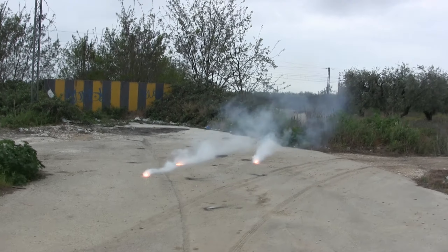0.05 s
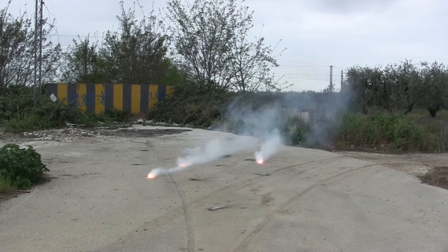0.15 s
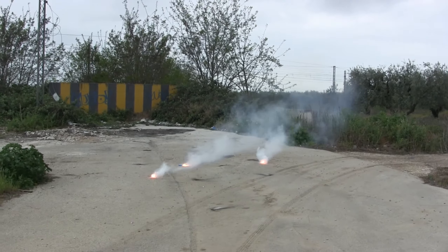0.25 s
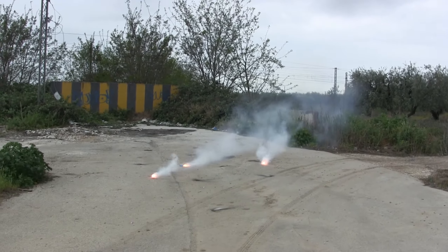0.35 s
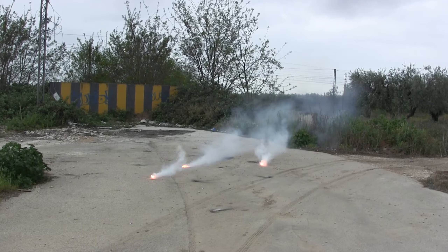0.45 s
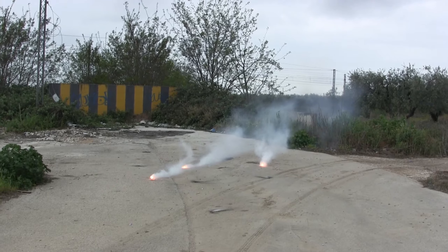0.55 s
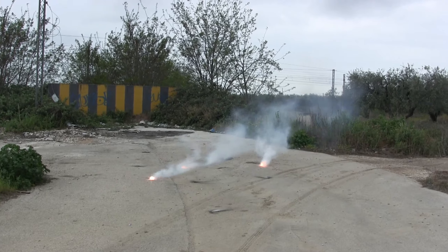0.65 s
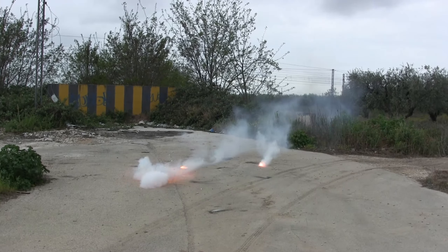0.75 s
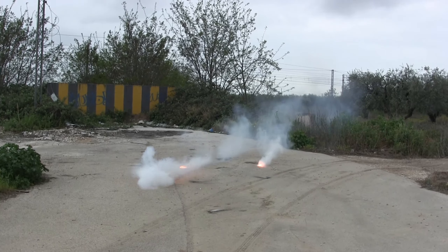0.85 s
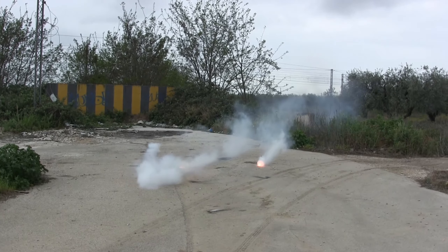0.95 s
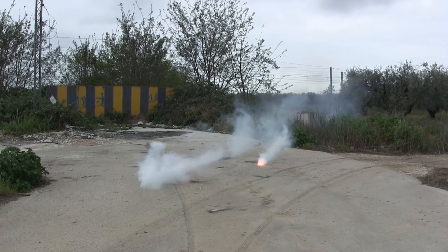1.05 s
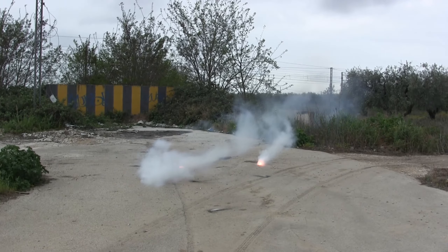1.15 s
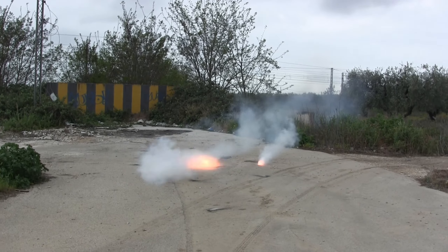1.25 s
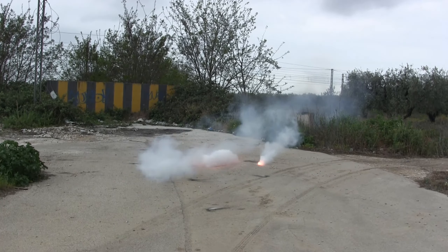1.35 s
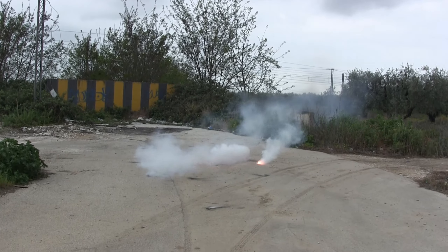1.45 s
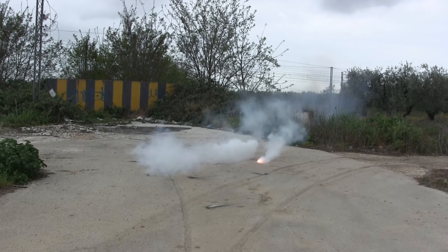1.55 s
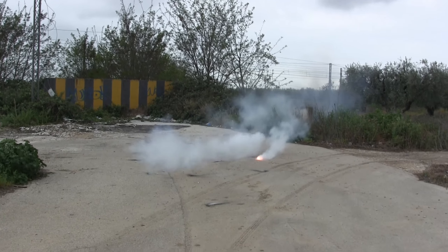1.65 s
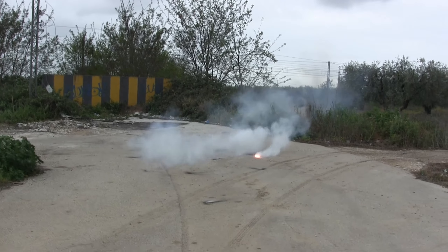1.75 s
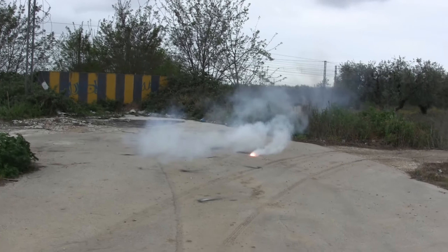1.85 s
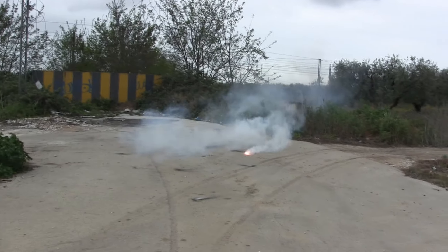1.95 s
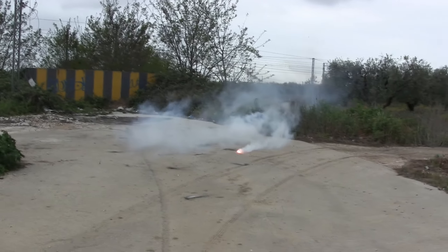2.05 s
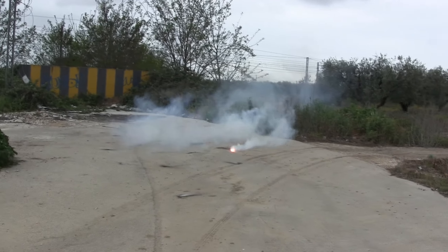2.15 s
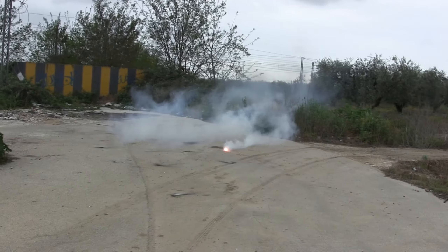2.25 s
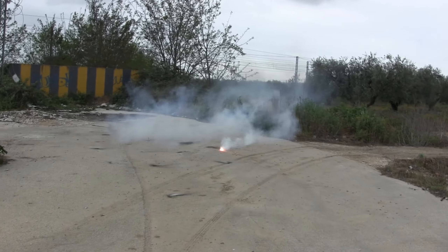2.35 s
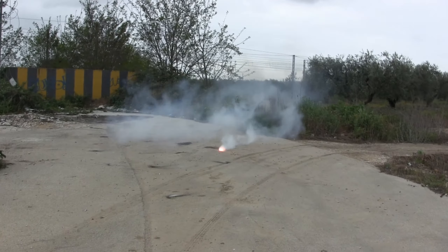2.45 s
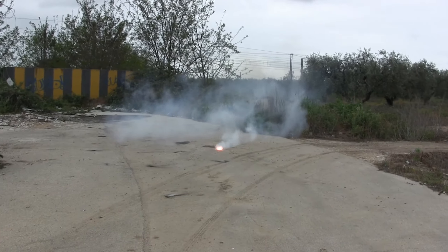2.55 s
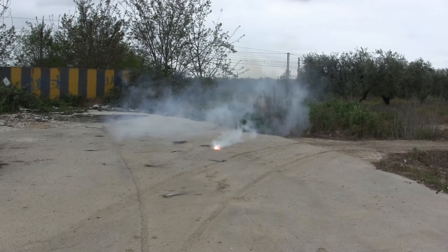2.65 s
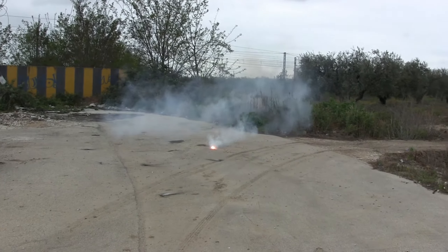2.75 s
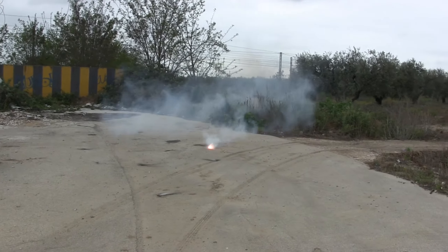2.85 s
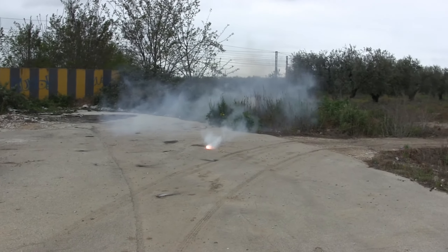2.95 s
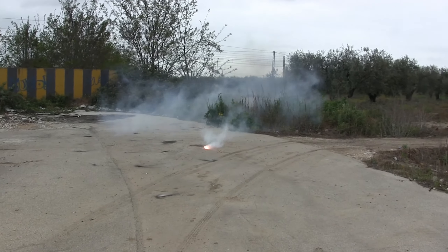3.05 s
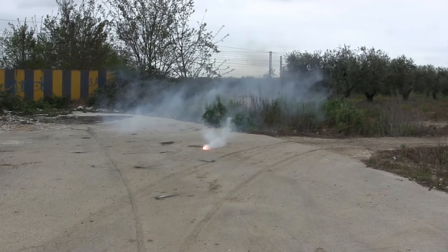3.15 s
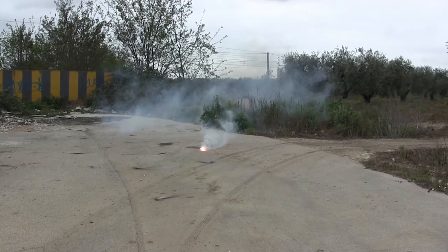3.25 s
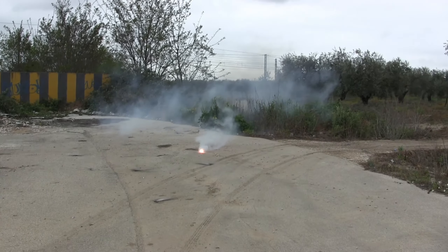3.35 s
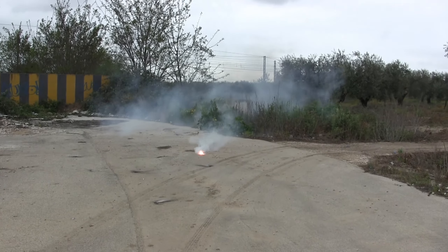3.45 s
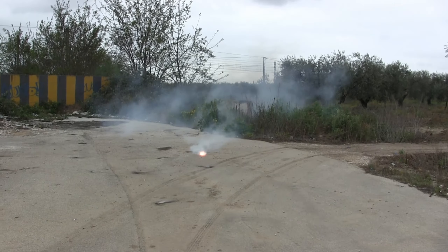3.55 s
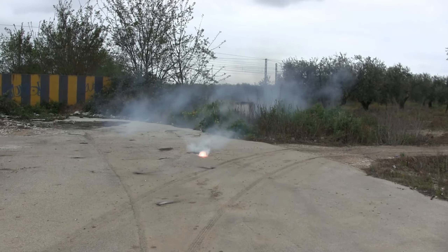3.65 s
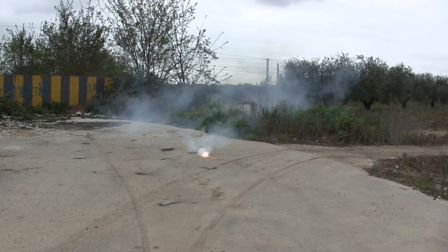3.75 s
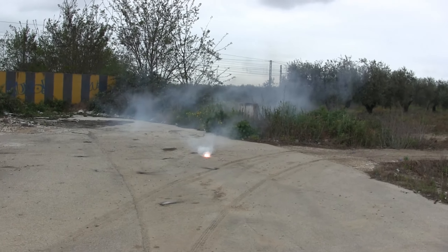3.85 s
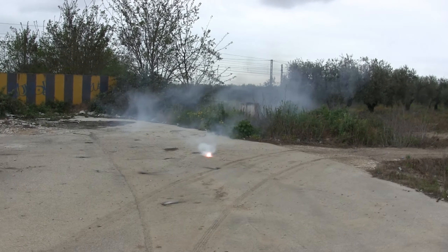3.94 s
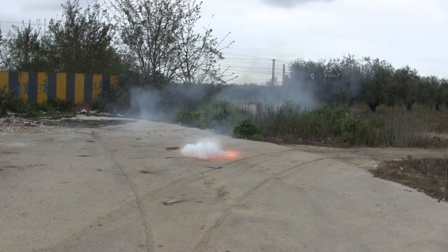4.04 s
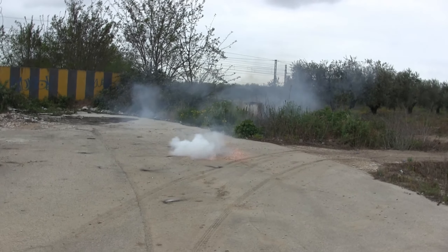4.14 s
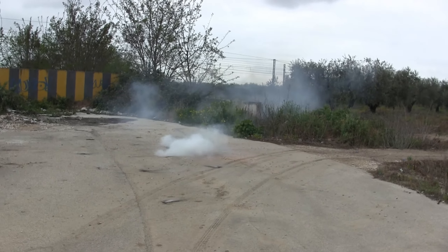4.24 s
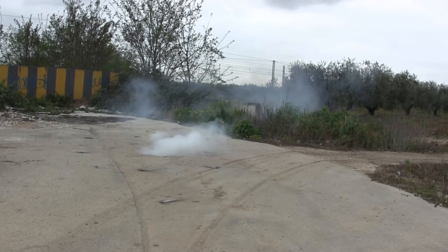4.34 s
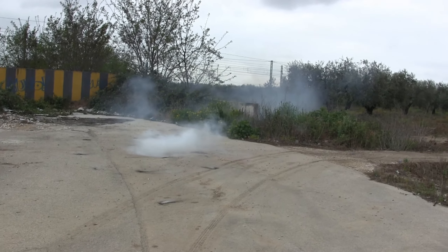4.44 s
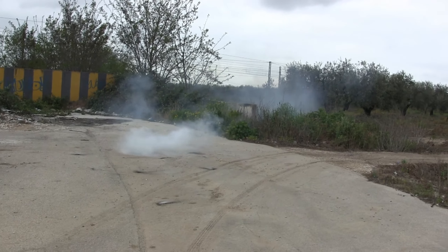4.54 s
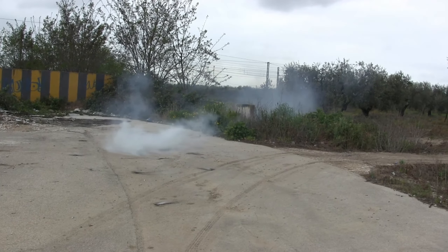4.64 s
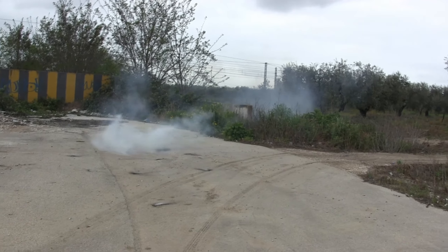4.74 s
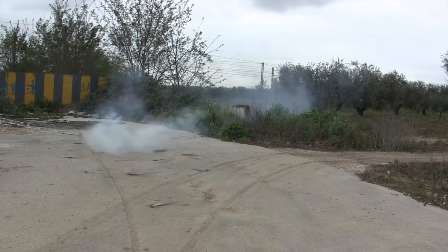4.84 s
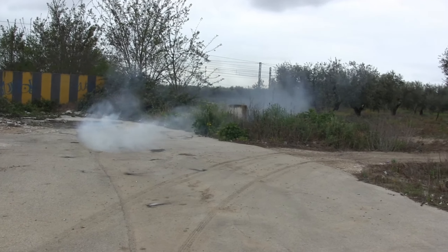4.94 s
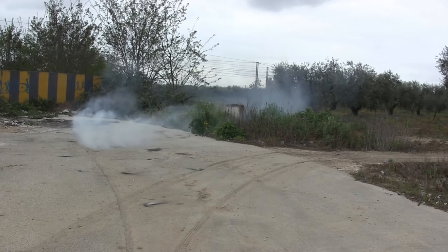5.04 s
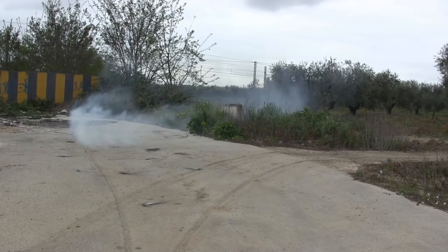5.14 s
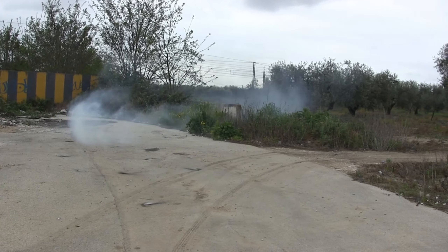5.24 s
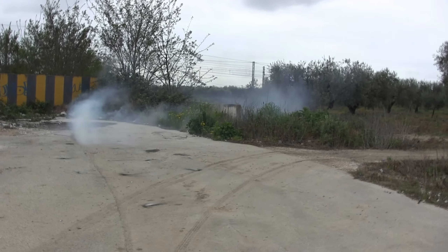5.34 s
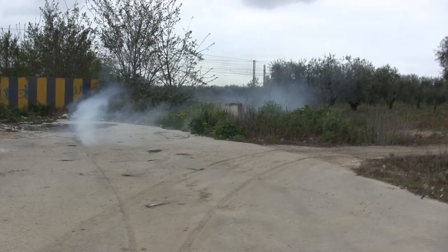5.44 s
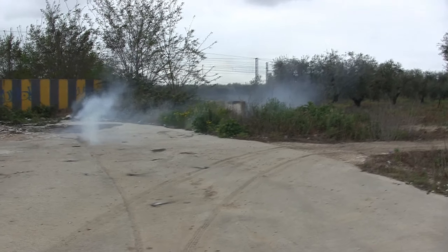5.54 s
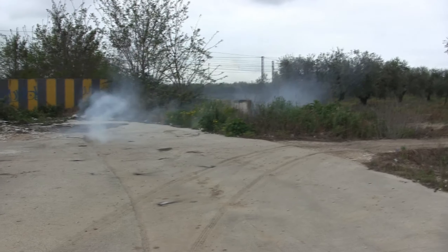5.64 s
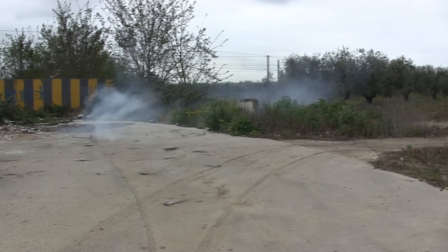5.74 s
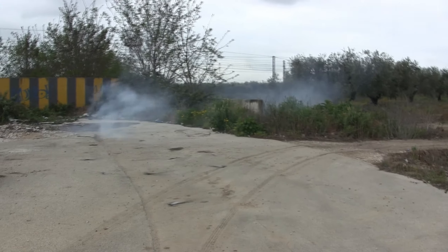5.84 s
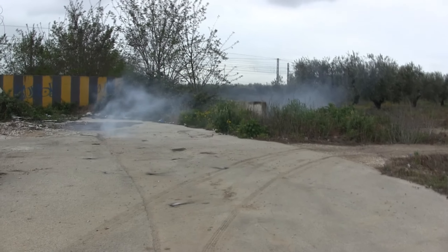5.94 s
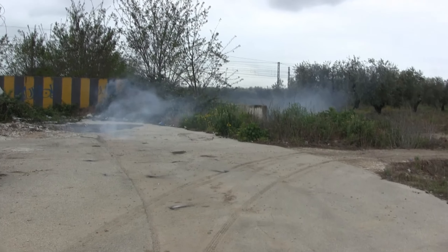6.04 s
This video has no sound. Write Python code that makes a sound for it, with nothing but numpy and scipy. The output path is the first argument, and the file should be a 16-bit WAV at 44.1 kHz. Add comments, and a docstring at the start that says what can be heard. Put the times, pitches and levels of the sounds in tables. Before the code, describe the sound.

An open concrete yard outdoors, a camcorder microphone some metres from three firecrackers. From 0 to 0.8 s, strong wind thumps and flutters in the bass with a little rasp, over a faint, bright fuse hiss. At 0.86 s the first cracker explodes: an instant, clipped, dry crack that makes the recording level duck. A double knock from walls follows about 0.1 s later, then a dense, grainy roll from trees. At 1.43 s a second bang cuts in with similar knocks; hollow double claps return from a building off to the left near 1.4 and 2.0 s. From 2.2 to 3.8 s, softer wind thumps and thin hiss remain, with a small flare near 3.3 s. The last fuse sputters at 3.85 s; the third bang hits at 4.17 s, with wall knocks, rolling echoes and a hollow clap at 4.73 s. The tail fades into quiet rustle and low gusts until about 6 s.

```python
"""An open concrete yard, the microphone some metres from three firecrackers that burn down and explode.
Fuses hiss as coloured noise; each blast is a shock wave that overloads the microphone.
Walls, far buildings and trees return it as filtered shocks and noise; short bright ticks are noise bursts.
Wind buffets the microphone as bass noise, and the camcorder's gain control ducks everything after each bang."""
import sys
import numpy as np
from scipy import signal
from scipy.fft import rfft, irfft, next_fast_len
from scipy.io import wavfile
from scipy.ndimage import uniform_filter1d, minimum_filter1d, map_coordinates

SR = 44100
rng = np.random.default_rng(int(sys.argv[2]) if len(sys.argv) > 2 else 0)


def wav_record(signal):
    """Record a signal, one row per channel, as 16-bit PCM in the file named by sys.argv[1]."""
    frames = np.transpose(np.atleast_2d(signal))
    bounded = np.clip(frames, -1, 1)
    # unit amplitude maps onto the largest positive 16-bit level
    quanta = np.round(bounded * 32767).astype(np.int16)
    wavfile.write(sys.argv[1], SR, quanta)


N = 268569
SHORT = SR // 8  # samples in a short burst

# In the tables, colour_db is relative spectrum level and sigma_s the standard deviation of a bell-shaped swell.
# t60_s is the time to decay by 60 dB; likeness is left-right correlation, held within -1 to 1.


def amp(db):
    """Decibels to gain."""
    return 10 ** (np.asarray(db) / 20)


def unit(x):
    """Scale to rms 1."""
    return x / np.sqrt(np.mean(x ** 2) + 1e-20)


def along(points, hz):
    """Read (Hz, value) points on a logarithmic frequency axis."""
    point_hz, value = np.transpose(points)
    return np.interp(np.log(hz + 1), np.log(point_hz + 1), value)


def curve(rows):
    """Read (s, value) rows as one value per sample."""
    return np.interp(np.arange(N) / SR, *np.transpose(rows))


def wobble(rate, size=N):
    """A smooth random curve with rate knots a second."""
    knots = rng.standard_normal(int(size * rate / SR) + 4)
    return map_coordinates(knots, [np.arange(size) * rate / SR])


def edge(x, hz, kind, order=2):
    """Causal low-pass or high-pass."""
    sos = signal.butter(order, min(hz, .45 * SR), kind, fs=SR, output="sos")
    return signal.sosfilt(sos, x)


def add(track, s, sound):
    """Mix a sound into a track at time s."""
    start = max(round(s * SR), 0)
    part = track[:, start:][:, :sound.shape[-1]]
    part += sound[..., :part.shape[1]]


def noise(spectrum, alike, size=N, grain_db=0, per_s=SR):
    """Coloured stereo noise of rms 1; grain makes it crackle, a low rate leaves single clicks."""
    m = next_fast_len(size)
    hz = np.fft.rfftfreq(m, 1 / SR)
    # the likeness sets the balance of mid and side
    turn = np.arccos(np.clip(along(alike, hz), -1, 1)) / 2
    shape = amp(along(spectrum, hz)) * np.array([np.cos(turn), np.sin(turn)])
    grain = amp(grain_db * np.minimum(rng.standard_normal(m), np.pi))
    white = rng.standard_normal((2, m)) * grain
    white = white * (rng.random((2, m)) < per_s / SR)
    mid, side = irfft(rfft(white) * shape, m)[:, :size]
    return unit(np.array([mid + side, mid - side]))


def widen(x, db):
    """Raise or lower the part that differs between the channels."""
    mid = x.mean(axis=0)
    return mid + amp(db) * (x - mid)


def fade(t60):
    """An exponential decay."""
    return np.exp(-np.log(1000) * np.arange(SHORT) / SR / t60)


def swell(t60):
    """A decay with a rounded start."""
    return fade(t60) * (1 - fade(t60 / 3))


def surge(s, sigma_s):
    """A bell-shaped rise and fall around time s."""
    return np.exp(-.5 * ((np.arange(N) / SR - s) / sigma_s) ** 2)


def shock(push_ms):
    """A push and a longer suction, longer on the left; the microphone's bass cut makes it swing back."""
    channel_push_ms = push_ms * np.array([[1.13], [.88]])
    u = np.arange(SHORT) / SR * 1000 / channel_push_ms
    return edge((1 - u) * np.exp(-u), hz=142, kind="high")


def slap(centre_hz, t60, alike):
    """A rough surface smears a shock into a short coloured burst."""
    colour = [(centre_hz / 5, -18), (centre_hz / 1.4, 0), (centre_hz * 1.4, -1),
              (centre_hz * 2.2, -8), (centre_hz * 8, -24)]
    burst = noise(colour, [(1000, alike)], SHORT) * swell(t60)
    return amp(2.5) * edge(burst, 3 * centre_hz, "low")


# steady wind on the microphone, before its trim: time_s, level_db
WIND_STRENGTH = [(0.0, -16.5), (0.754, -18.5), (0.8, -19), (1.75, -28), (1.88, -25.5), (2.14, -26),
                 (3.1, -27), (3.67, -25), (4.04, -29.5), (4.15, -31), (4.3, -18.5), (4.584, -36.5),
                 (4.842, -40), (5.116, -53), (5.282, -24.5), (5.6, -20.5), (5.744, -20), (6.09, -33)]
# gusts that thump on the microphone, before their trim: centre_s, level_db, sigma_s
WIND_GUSTS = [(0.041, -1, 0.023), (0.12, -1.5, 0.011), (0.176, -1.5, 0.042), (0.28, 0.5, 0.01),
              (0.486, -3.5, 0.021), (0.703, -3, 0.02), (0.812, -7.5, 0.053), (1.173, -17, 0.039),
              (1.71, -4, 0.068), (1.949, -7.5, 0.032), (2.114, -6.5, 0.024), (2.309, -6, 0.036),
              (2.391, -22, 0.0085), (2.573, -4.5, 0.017), (2.668, -17, 0.026), (2.757, -13, 0.0093),
              (2.868, -16, 0.02), (3.504, -10.5, 0.02), (3.796, -13, 0.018), (4.133, -17, 0.017),
              (4.708, -17, 0.03), (5.113, -13.5, 0.024), (5.196, -12, 0.023), (5.448, -10.5, 0.023),
              (6.046, -9.5, 0.048)]
# colour of the buffeting, before its bass filters: freq_hz, colour_db
BUFFET_COLOUR = [(13, -40), (22, -8.5), (54, 0), (90, 1.5), (128, -0.5), (267, -11.5), (656, -31),
                 (977, -38), (1350, -45), (2600, -56), (3380, -78), (5720, -120)]
# stereo likeness of buffeting and rasp: freq_hz, likeness
BUFFET_LIKENESS = [(60, 0.13), (180, 0.34), (550, 0.28), (1650, -0.021), (4970, 0.79), (15000, 0.64)]
# colour of the rasp, where the hardest eddies tear: freq_hz, colour_db
RASP_COLOUR = [(300, -21), (600, -4), (1100, -1), (1700, -9), (3500, -25)]
# the sharpest gusts tear at the microphone: centre_s, level_db, sigma_s, centre_hz
TEARING_GUSTS = [(0.047, -28, 0.014, 1030), (0.186, -27.5, 0.0045, 990), (0.243, -32.5, 0.0055, 950),
                 (0.285, -35, .006, 950), (0.49, -39, 0.0081, 950), (0.683, -37.5, 0.016, 970),
                 (2.077, -30, 0.026, 296), (2.275, -31, 0.011, 380), (2.566, -36, 0.013, 600),
                 (2.646, -41, 0.031, 630), (2.842, -40.5, 0.02, 600), (3.104, -41.5, 0.048, 634),
                 (3.114, -31, 0.053, 308)]
# colour of a tearing gust: multiple_of_centre_hz, colour_db
TEAR_COLOUR = [(.2, -15), (.5, -3.5), (1, 5.5), (1.6, -12), (3.5, -24), (8, -43), (30, -83)]
# rustle of open country: freq_hz, colour_db
COUNTRY_COLOUR = [(25, -12), (55, -14), (110, -20), (290, -21), (500, -7), (604, -3), (893, -9.5),
                  (1090, -8), (1190, -8), (1530, -11), (5470, -26.5), (9630, -32.5), (16000, -37.5)]
# stereo likeness of the rustle and the fuse's spitting: freq_hz, likeness
COUNTRY_LIKENESS = [(300, -1.2), (700, -0.57), (1300, -0.55), (2500, -0.25), (5000, 0.45), (12000, 0.51)]
WIND_TRIM_DB, GUST_TRIM_DB = 4, -8
STEADY_BASS_HZ = 43.4  # small eddies carry little below this
GUST_BOOM_DB, GUST_BOOM_HZ = 2.5, 91.6  # gusts are big eddies and boom deeper
RASP_DB, RASP_FLUTTER_DB = -25, 2  # level at full-scale wind; scale of its short bursts
RASP_GROWS = 2.4  # dB of rasp per dB of wind


def wind():
    """Eddies and deeper gusts thump on the microphone ports, strong wind rasps; open country rustles."""
    steady = amp(curve(WIND_STRENGTH) + WIND_TRIM_DB)
    gusts = sum(amp(db + GUST_TRIM_DB) * surge(s, sigma_s) for s, db, sigma_s in WIND_GUSTS)
    shared_db = .7 * wobble(14) + 1.7 * wobble(55)
    channel_db = 1.3 * np.array([wobble(60), wobble(60)])
    eddies = unit(amp(shared_db + channel_db))
    steady_noise = edge(noise(BUFFET_COLOUR, BUFFET_LIKENESS), STEADY_BASS_HZ, "high", order=1)
    buffet = np.hypot(steady, gusts) * eddies * steady_noise
    deep_noise = edge(noise(BUFFET_COLOUR, BUFFET_LIKENESS), GUST_BOOM_HZ, "low")
    boom = amp(GUST_BOOM_DB) * gusts * deep_noise
    rasp_level = amp(RASP_DB + RASP_FLUTTER_DB * wobble(30)) * (steady * eddies) ** RASP_GROWS
    rasp = rasp_level * noise(RASP_COLOUR, BUFFET_LIKENESS)
    for s, db, sigma_s, hz in TEARING_GUSTS:
        colour = [(k * hz, level_db) for k, level_db in TEAR_COLOUR]
        rasp += amp(db) * surge(s, sigma_s) * noise(colour, BUFFET_LIKENESS)
    stir_db = .5 * wobble(3)
    rustle = amp(-41.0 + stir_db) * noise(COUNTRY_COLOUR, COUNTRY_LIKENESS)
    return buffet + boom + rasp + rustle


# soft, broad returns from far groves: centre_s, level_db, centre_hz, sigma_s
GROVE_RETURNS = [(1.137, -22, 560, 0.033), (1.207, -23.5, 615, 0.02), (1.702, -19, 620, 0.031),
                 (1.767, -17.5, 1190, 0.012), (4.42, -20, 880, 0.028), (4.518, -24.5, 800, 0.0098),
                 (2.112, -35, 1220, 0.034), (2.216, -30.5, 1150, 0.012), (4.667, -25.5, 1200, 0.0069),
                 (4.723, -28.5, 1290, 0.004), (4.964, -34.5, 1330, 0.029)]


def groves():
    """Far clumps of trees send each blast back as a soft swell of noise in the tail."""
    out = np.zeros((2, N))
    likeness = [(400, 0.45), (900, -0.42), (3000, -0.09)]
    for s, db, hz, sigma_s in GROVE_RETURNS:
        colour = [(hz / 6, -16), (hz / 1.6, -2), (hz, 0), (hz * 2, -7), (hz * 4, -20), (hz * 8, -45)]
        out += amp(db) * surge(s, sigma_s) * noise(colour, likeness, grain_db=4.5)
    return out


# building echoes, carried differently by the wind each time:
# start_s, level_db, bass_edge_hz, treble_edge_hz, second_face_db
BUILDING_CLAPS = [(1.4118, 10, 350, 1000, -3), (1.4185, 5, 380, 750, 8), (1.9863, 13, 1000, 1500, -7),
                  (2, 3, 1150, 1500, 7), (4.7264, 7, 600, 2540, -11), (4.7346, -5, 500, 1496, -9),
                  (4.7402, -9, 500, 1700, -6)]
FACE_GAP_S = 0.0016  # the distant building off to the left has two faces
BUILDING_RIGHT = -0.68  # gain of the right channel: weaker and inverted
BUILDING_ROUGH_DB = -22  # smaller ledges trail after each clap, relative to it


def building():
    """The sharp, hollow double clap returned from the side half a second after each blast."""
    out = np.zeros((2, N))
    for s, db, bass_hz, treble_hz, second_db in BUILDING_CLAPS:
        without_bass = edge(shock(push_ms=1.0)[0], bass_hz, "high")
        wave = edge(without_bass, treble_hz, "low")
        clap = np.array([wave, BUILDING_RIGHT * np.roll(wave, 1)])  # right is one sample later
        add(out, s, amp(db) * clap)
        add(out, s + FACE_GAP_S, amp(db + second_db) * clap)
        ledges = slap(centre_hz=.7 * treble_hz, t60=0.037, alike=-0.82)
        add(out, s, amp(db + BUILDING_ROUGH_DB) * ledges)
    return out


# returns from two walls: start_s, thump_db, thump_hz, crack_db, crack_hz, gap_between_facets_s
WALL_RETURNS = [(0.9622, 14.5, 263, 28, 586, 0.0004), (0.9761, 17.5, 200, 28, 2240, 0.0009),
                (1.5308, 17, 305, 29, 616, 0.0014), (1.5432, 18, 205, 25.5, 1870, 0.001),
                (4.2670, 17.5, 197, 23.5, 1150, 0.0009), (4.2776, 17, 220, 29, 1500, 0.00066)]
THUMP_LAG_S, THUMP_T60_S = 0.002, 0.028  # the bass comes back a little later and dies fast
CRACK_Q = 2.3  # sharpness of the crack's colour
WALL_ROUGH_DB, WALL_ROUGH_T60_S = -22, 0.025  # rough plaster smears part of each crack


def walls():
    """The double knock a tenth of a second after a blast: each wall gives a ragged crack, then a thump."""
    out = np.zeros((2, N))
    wave = shock(push_ms=0.35)
    t = np.arange(SHORT) / SR
    for s, thump_db, thump_hz, crack_db, crack_hz, gap_s in WALL_RETURNS:
        coloured = signal.lfilter(*signal.iirpeak(crack_hz, CRACK_Q, fs=SR), wave)
        crack = edge(coloured, 2 * crack_hz, "low")
        thump = np.sin(2 * np.pi * thump_hz * t) * fade(THUMP_T60_S)
        for facet_s in (0, gap_s):
            add(out, s + facet_s, amp(crack_db) * crack)
        plaster = slap(centre_hz=1180, t60=WALL_ROUGH_T60_S, alike=1.0)
        add(out, s, amp(crack_db + WALL_ROUGH_DB) * plaster)
        add(out, s + THUMP_LAG_S, -amp(thump_db) * thump)
    return out


# short bright ticks: sparks, falling scraps and the sharp treble edges of some echoes,
# before a common 9 dB cut: start_s, level_db, centre_hz, t60_s
BRIGHT_TICKS = [(1.0972, -4, 3200, 0.0049), (1.1055, -1, 6100, 0.0065), (1.127, -12, 5800, 0.0082),
                (1.208, -11, 5530, 0.039), (1.592, 2, 3740, 0.0056), (2.135, -25.5, 6960, 0.0099),
                (2.556, -31.5, 10000, 0.095), (2.998, -28, 9000, .01), (4.412, -2, 5300, 0.024),
                (4.4297, -1, 5060, 0.023), (4.7272, -18.5, 5800, 0.008), (5.3874, -23, 6200, 0.012)]


def ticks():
    """Sparks, falling scraps and the treble edges of some echoes tick as short bright noise bursts."""
    out = np.zeros((2, N))
    for s, db, hz, t60 in BRIGHT_TICKS:
        colour = [(hz / 4, -16), (hz / 1.4, -8), (hz, 0), (hz * 1.4, -10), (hz * 2.7, -26)]
        tick = fade(t60) * noise(colour, [(5000, 0.72)], SHORT)
        add(out, s, amp(db - 9) * edge(tick, 2 * hz, "low"))
    return out


# colour of the burning jet: freq_hz, colour_db
JET_COLOUR = [(800, -4), (2000, -14), (3500, -6), (5000, -4.5), (6400, -4.5), (7600, -14), (9500, -22),
              (15000, -31)]
# a fuse flares up: centre_s, level_db, sigma_s
FUSE_FLARES = [(0.005, -35.5, 0.088), (0.64, -39.5, 0.26), (3.304, -44, 0.07), (3.35, -49.5, 0.18),
               (4.105, -48, 0.19)]
# the last fuse sputters, before a common 13.5 dB cut: start_s, level_db, t60_s
FUSE_SPUTTER = [(3.843, -8.5, 0.044), (3.861, -14.5, 0.12), (3.896, -13.5, 0.045), (3.909, -8.5, .028),
                (3.953, -12.5, 0.022)]
# colour of the sputtering: freq_hz, colour_db
SPIT_COLOUR = [(400, -16), (900, -6), (1400, 2), (2400, -14.5), (4200, -8.5), (6000, -27), (12000, -31)]
BURN_DB = -54  # a fuse burning evenly
CRACKLE_DB = 4  # graininess of the jets and of the leaves' echoes


def fuses():
    """Jets of hot gas flare, flutter and spit until the last cracker goes."""
    burning = np.arange(N) / SR < BLASTS[-1][0]
    flare_power = sum((amp(db) * surge(s, sigma_s)) ** 2 for s, db, sigma_s in FUSE_FLARES)
    flow = np.sqrt(amp(BURN_DB) ** 2 + flare_power)
    flutter_db = .8 * wobble(60)
    hiss = noise(JET_COLOUR, [(1500, 1.0), (4500, 0.97)], grain_db=CRACKLE_DB)
    out = hiss * flow * amp(flutter_db) * burning
    for s, db, t60 in FUSE_SPUTTER:
        spit = noise(SPIT_COLOUR, COUNTRY_LIKENESS, SHORT, grain_db=-0.5)
        add(out, s, amp(db - 13.5) * swell(t60) * spit)
    return out


# belts of bushes and trees: delay_s, level_db, time_to_swell_by_60_db_s, t60_s
TREE_BELTS = [(0.091, -35.5, 1.5, 0.8), (0.105, -26, 0.32, 0.12), (0.246, -42, 7, 0.53),
              (.46, -53.5, 1, 1.1), (.63, -58.5, 0.5, 1.8), (.785, -56.5, 0.5, 0.84)]


def thickets(size):
    """Strength of the scattered sound: each belt swells as the shock reaches it, then dies away."""
    t = np.arange(size) / SR
    belts = []
    for delay, db, rise, t60 in TREE_BELTS:
        drop_db = 60 * np.maximum((delay - t) / rise, (t - delay) / t60)
        belts.append(amp(db - drop_db))
    return np.linalg.norm(belts, axis=0)


# colour of the scattered sound, before air loss: freq_hz, colour_db
FOLIAGE_COLOUR = [(40, -37), (120, -8.5), (300, -2), (700, 2.5), (1200, 0), (2500, -2), (5000, -6),
                  (8000, -11), (12000, -19), (16000, -25)]
# stereo likeness of the scattered sound, before its width is set: freq_hz, likeness
FOLIAGE_LIKENESS = [(60, -0.6), (130, -0.0035), (290, 0.21), (640, -0.56), (1410, -0.57), (3100, -0.3),
                    (6820, 0.28), (15000, 1)]
TRUNKS_PER_S, TRUNKS_DB = 850, -3.5  # single sharp echoes from trunks and posts, relative to leaves
ROLL_DB = 1.3  # scale of the roll's unevenness


def scatter():
    """Countless echoes merge into a dense roll; over longer paths the air absorbs more treble."""
    size = 3 * SR // 2
    leaves = noise(FOLIAGE_COLOUR, FOLIAGE_LIKENESS, size, grain_db=CRACKLE_DB)
    trunks = noise(FOLIAGE_COLOUR, FOLIAGE_LIKENESS, size, per_s=TRUNKS_PER_S)
    echoes = unit(leaves + amp(TRUNKS_DB) * trunks)
    hz, t, z = signal.stft(echoes, SR, nperseg=256)
    loss_db = 26 * (hz[:, None] / 6000) ** 1.03 * t
    # the mid range returns in lumps, the treble more evenly
    across_hz = uniform_filter1d(rng.standard_normal(z.shape), 8, 0)
    lumps = unit(uniform_filter1d(across_hz, 5, 1))
    lumps_db = along([(1000, 2.5), (5000, 1)], hz)[:, None] * (lumps - .35)
    tail = signal.istft(z * amp(lumps_db - loss_db), SR, nperseg=256)[1][:, :size]
    uneven_db = ROLL_DB * (wobble(50, size) + wobble(300, size))
    return tail * thickets(size) * amp(uneven_db)


# the explosions, with nominal push time: start_s, level_db, push_ms, second_shock_delay_s,
# second_shock_db and tearing_case_db and scatter_db (relative to level_db), scatter_width_db
BLASTS = [(0.8581, 33, 0.67, 0.00089, -1, -22.5, -0.5, -3.5),
          (1.4347, 32, 0.95, 0.00082, -8, -47, -0.5, -1.2),
          (4.1695, 31, 0.97, 0.00195, 14, -24.5, -0.45, 1)]
# things around the yard that answer every blast:
# delay_s, level_db (relative to the blast), centre_hz, t60_s, likeness
YARD_ECHOES = [(.0052, -16, 574, 0.024, -0.81), (.006, -25, 3040, 0.011, -0.069),
               (0.031, -26, 1200, 0.011, 0.062), (.053, -42, 3380, 0.0087, 0.44),
               (0.114, -34, 1200, 0.041, .8), (0.16, -45, 1500, 0.022, .2), (.275, -57, 1040, 0.08, -1.1),
               (.329, -55, 1290, 0.05, -0.83)]
# rough slaps out of the roll, the last a long trail behind the building's clap:
# start_s, level_db, centre_hz, t60_s, likeness
ROLL_SLAPS = [(1.075, 0.5, 770, 0.038, 0.22), (1.191, -5, 2210, 0.009, -1.2), (1.5945, 0, 690, 0.018, 0.97),
              (1.671, -8, 890, .05, 0.29), (1.705, -8, 780, 0.067, -0.43),
              (1.762, -11.5, 2400, 0.016, -0.62), (4.351, -2.5, 378, 0.038, 0.55),
              (4.382, 2, 700, 0.023, 0.3), (4.446, -6, 684, 0.058, -0.65), (4.504, -13.5, 980, 0.022, -0.4),
              (4.732, -19.5, 557, 0.22, -0.93)]


def bangs():
    """Each case bursts with a shock and a second one on its heels; echoes, a roll and rough slaps follow."""
    out = np.zeros((2, N))
    for s, db, push_ms, second_s, second_db, tear_db, scatter_db, width_db in BLASTS:
        tear = noise([(500, 8.5), (3500, 4.0), (12000, -12.0)], [(1000, 0.041)], SHORT)
        first = shock(push_ms) + amp(tear_db) * tear * fade(0.06)
        add(out, s, amp(db) * first)
        second = shock(push_ms=0.21) + amp(-4.0) * tear * fade(0.0014)
        add(out, s + second_s, amp(db + second_db) * second)
        for delay, echo_db, centre_hz, t60, alike in YARD_ECHOES:
            add(out, s + delay, amp(db + echo_db) * slap(centre_hz, t60, alike))
        add(out, s, amp(db + scatter_db) * widen(scatter(), width_db))
    for s, db, centre_hz, t60, alike in ROLL_SLAPS:
        add(out, s, amp(db) * slap(centre_hz, t60, alike))
    return out


def scene():
    """Everything that reaches the microphone."""
    return wind() + groves() + building() + walls() + ticks() + fuses() + bangs()


def gain_control(x, threshold_db, range_db, hold_s, release_db_per_s, attack_s):
    """A peak over the threshold pulls the gain down fast; it waits, then climbs back at a steady rate."""
    peak_db = 20 * np.log10(np.abs(x).max(axis=0) + 1e-9)
    over_db = np.clip(peak_db - threshold_db, 0, range_db)
    half = round(hold_s * SR / 2)
    # the largest overshoot within the past hold time
    held_db = -minimum_filter1d(-over_db, 2 * half + 1, origin=half, mode="constant")
    climb_db = release_db_per_s * np.arange(N) / SR
    cut_db = np.maximum.accumulate(held_db + climb_db) - climb_db
    keep = np.exp(-1 / (attack_s * SR))
    smooth_cut_db = signal.lfilter([1 - keep], [1, -keep], cut_db)
    return x * amp(-smooth_cut_db)


SOFTEN_HZ = 11700  # the microphone's treble falls away above this
TOP_HZ = 16000  # nothing passes from here up


def record(dry):
    """The camcorder's gain control is too slow for a shock, which clips; then soft treble and band limit."""
    ducked = gain_control(dry, threshold_db=8.0, range_db=23.0, hold_s=0.096,
                          release_db_per_s=99, attack_s=0.0036)
    clipped = np.clip(ducked, -.97, .97)
    heard = edge(clipped, SOFTEN_HZ, "low", order=1)
    m = next_fast_len(N + SR // 4)
    in_band = np.fft.rfftfreq(m, 1 / SR) < TOP_HZ
    return irfft(rfft(heard, m) * in_band, m)[:, :N]


dry = scene()
out = record(dry)
wav_record(out)
```